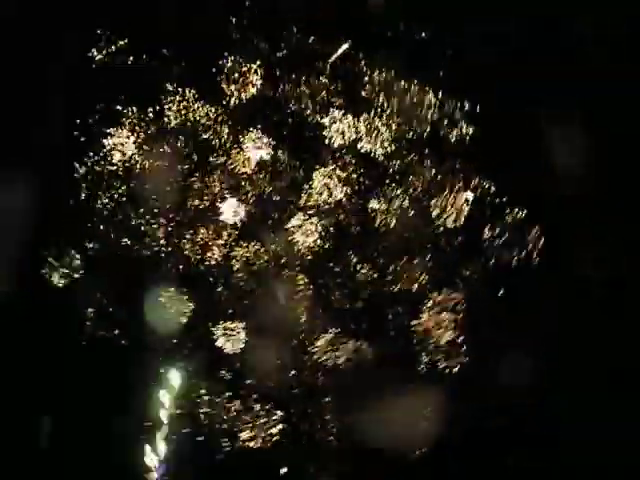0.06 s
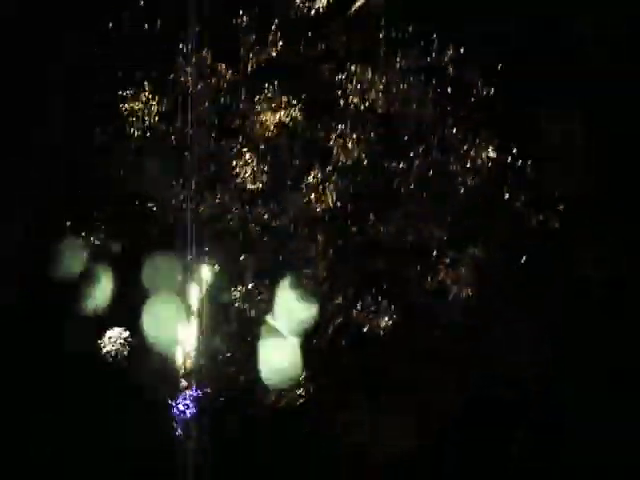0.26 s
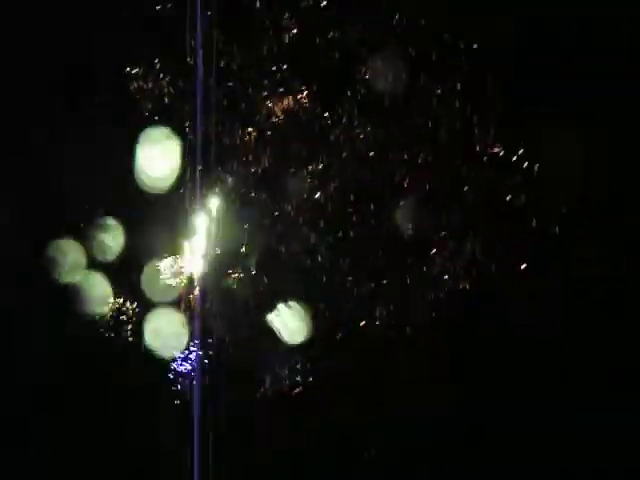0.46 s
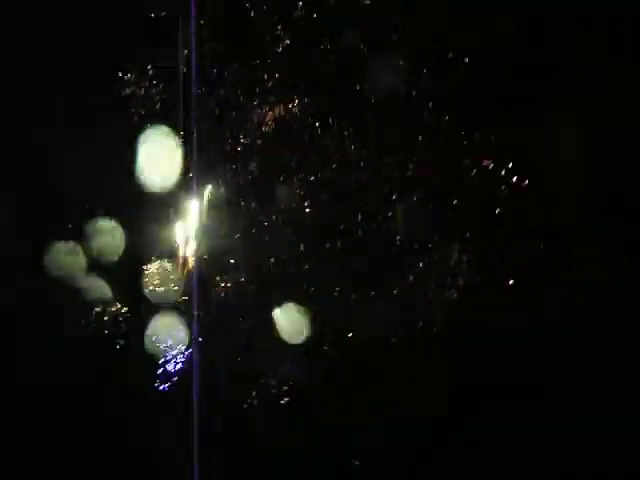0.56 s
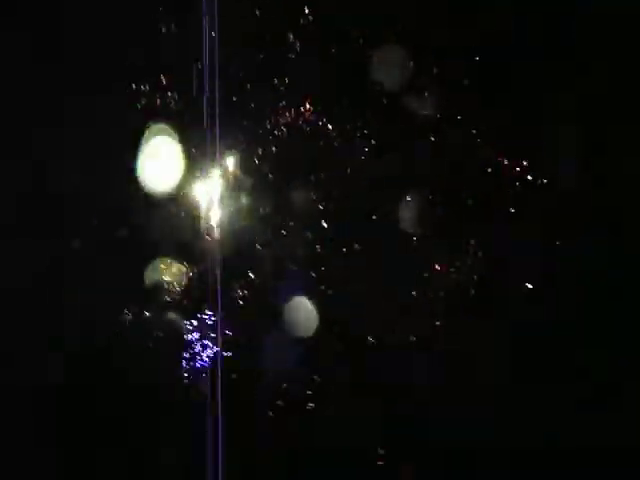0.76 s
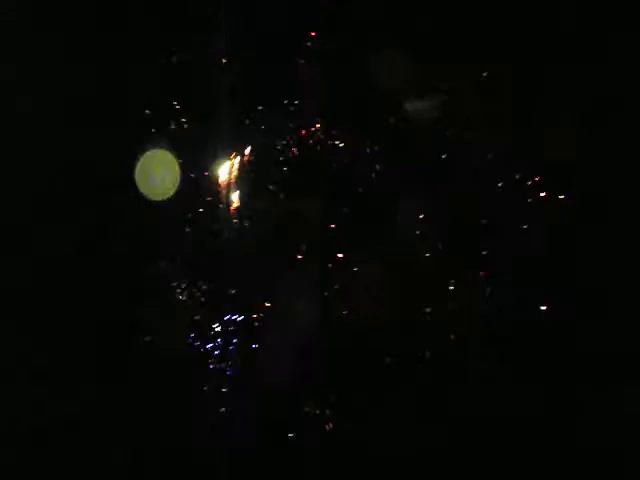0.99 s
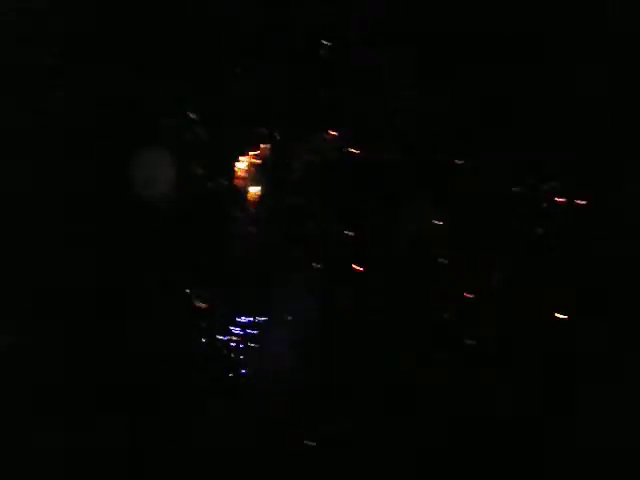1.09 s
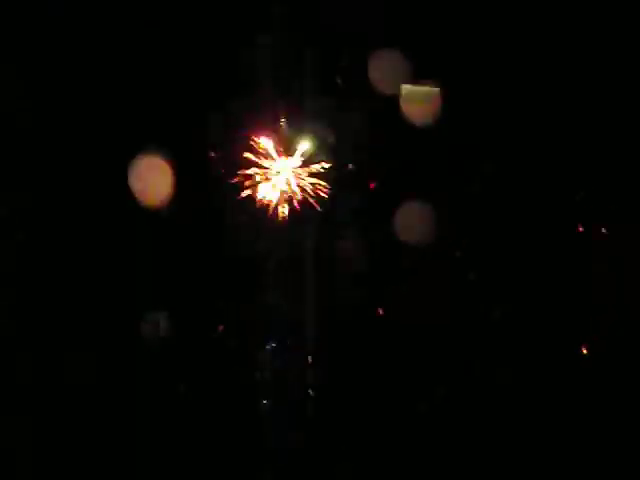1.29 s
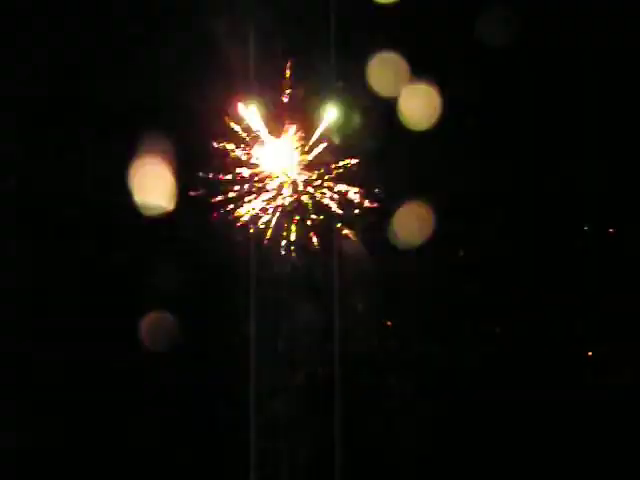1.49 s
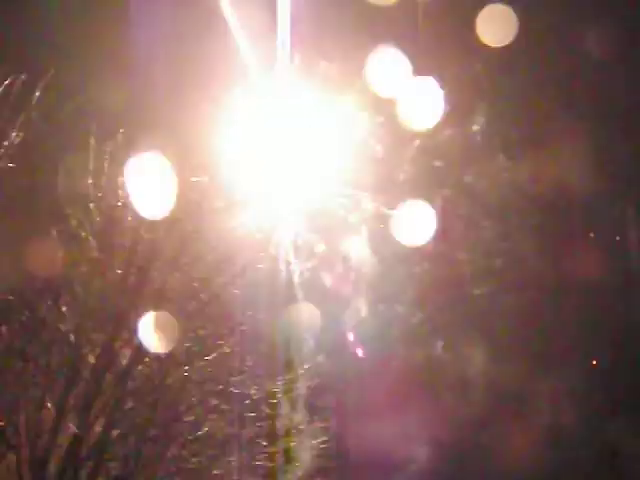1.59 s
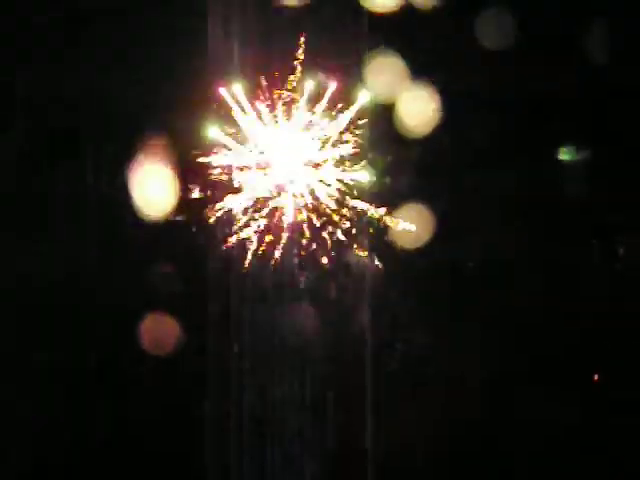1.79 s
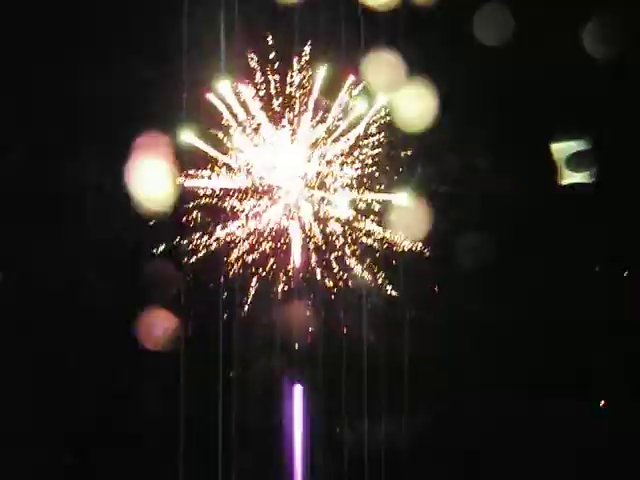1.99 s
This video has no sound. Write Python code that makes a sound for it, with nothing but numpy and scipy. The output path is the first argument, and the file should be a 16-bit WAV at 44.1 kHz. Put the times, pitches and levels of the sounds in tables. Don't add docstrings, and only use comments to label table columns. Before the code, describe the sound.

Fireworks over open ground: busy, gritty crackling and snapping pops above a distant knocking rumble, followed by three quick near blasts, the first strongest, flattened and distorted by a small, muffled, ringing microphone.

```python
import sys
import numpy as np
from scipy import signal
from scipy.fft import rfft, irfft, next_fast_len
from scipy.io import wavfile
from scipy.ndimage import uniform_filter1d

SR = 44100
rng = np.random.default_rng(int(sys.argv[2]) if len(sys.argv) > 2 else 0)


def decibels_to_gain(level_db):
    exponent = np.asarray(level_db, float) / 20
    return 10 ** exponent


def unload_audio(sound):
    columns = np.transpose(np.atleast_2d(sound))
    steps = np.round(np.clip(columns, -1, 1) * 32767)
    wavfile.write(sys.argv[1], SR, steps.astype(np.int16))


N = 90404

# t/s, push height/full scale, push decay/s, roar level/dB, roar hold/s
BURSTS = [
    (1.3242, 2.9, .012, -8.5, .0195),
    (1.6108, 1.6, .0135, -22, .014),
    (1.7744, 1.05, .018, -33, .010),
]
# f/Hz, level/dB
MIC_COLOUR = [(350, -30.5), (650, -11.5), (2000, -9.5), (2650, -4), (3070, 1.5), (3600, -8), (5200, -20),
              (9000, -57)]
ROAR_WAIT_S = .0155


def colour(x, points):
    size = next_fast_len(N + 8192)
    size += size % 2
    hz, db = np.transpose(points)
    bins_hz = np.arange(size // 2 + 1) * SR / size
    log_gain = np.interp(np.log(bins_hz + 1), np.log(hz), db) * np.log(10) / 20
    cepstrum = irfft(log_gain, size)
    cepstrum[1:size // 2] *= 2
    cepstrum[size // 2 + 1:] = 0
    return irfft(rfft(x, size) * np.exp(rfft(cepstrum)), size)[:N]


def rms_one(x):
    return x / np.sqrt(np.mean(x ** 2) + 1e-20)


def drift(rate_hz):
    settle = 9000
    r = np.exp(-2 * np.pi * rate_hz / SR)
    smooth = signal.lfilter([1], [1, -2 * r, r * r], rng.standard_normal(N + settle))
    return rms_one(smooth[settle:])


def since(s, longest=.25):
    at = slice(int(s * SR), min(int((s + longest) * SR), N))
    t = np.arange(at.start, at.stop) / SR - s
    return at, np.maximum(t, 0), np.clip(t * SR + 1, 0, 1)


def clicks(per_s, spread_db):
    sizes = decibels_to_gain(spread_db * np.minimum(rng.exponential(1, N), 4)) * rng.choice([-1, 1], N)
    return rms_one(sizes * (rng.random(N) < per_s / SR))


def stars(level_db, grain_db):
    stars_per_s, click_db, echo_db, clump_db = 1500, 2.0, -2.0, 1.5
    sharp = signal.lfilter([1, -0.8], [1], clicks(stars_per_s, spread_db=3.2))
    echoes = decibels_to_gain(echo_db) * rng.standard_normal(N)
    mix = decibels_to_gain(click_db + grain_db) * sharp + echoes
    clumps_db = clump_db * decibels_to_gain(grain_db) * drift(51)
    return decibels_to_gain(level_db + clumps_db) * rms_one(colour(mix, MIC_COLOUR))


def pops():
    # t/s of the peak, peak level/dB, length/ms
    loud_stars = [(0.0187, -15.0, 0.8), (0.0376, -11.0, 1.6), (0.0458, -14.0, 0.7), (0.0586, -17.5, 1.0),
                  (0.1459, -17.0, 0.8), (0.201, -10.0, 0.9), (0.206, -14.0, 0.6), (0.2093, -15.5, 0.8),
                  (0.2274, -16.5, 1.2), (0.2519, -12.5, 1.2), (0.258, -10.0, 1.1), (0.2751, -17.5, 0.7),
                  (0.2833, -16.0, 0.4), (0.294, -18.0, 0.5), (0.3051, -18.0, 0.7), (0.3318, -15.5, 0.8),
                  (0.336, -8.0, 1.6), (0.3389, -16.5, 0.6), (0.3796, -13.0, 0.6), (0.385, -16.0, 0.7),
                  (0.3884, -14.5, 0.7), (0.3932, -11.5, 0.9), (0.3995, -13.5, 0.7), (0.4043, -15.0, 0.5),
                  (0.4097, -3.0, 0.8), (0.4134, -8.5, 0.6), (0.4203, -17.5, 1.0), (0.4788, -13.5, 0.7),
                  (0.4848, -11.5, 1.3), (0.4875, -3.5, 0.7), (0.4953, -16.0, 1.7), (0.5013, -16.5, 2.1),
                  (0.5045, -18.5, 0.6), (0.5596, -16.5, 0.8), (0.6242, -14.0, 1.0), (0.6269, -15.5, 0.7),
                  (0.6354, -14.5, 0.8), (0.64, -15.5, 0.6), (0.6512, -15.0, 1.0), (0.6644, -16.0, 1.3),
                  (0.6723, -9.5, 0.9), (0.6858, -10.0, 1.1), (0.6905, -13.0, 0.5), (0.6983, -14.0, 0.6),
                  (0.7077, -11.0, 1.4), (0.729, -15.0, 1.1), (0.7341, -13.5, 0.9), (0.7485, -16.0, 0.7),
                  (0.7524, -13.5, 2.1), (0.7591, -15.5, 1.2), (0.7694, -14.0, 0.6), (0.791, -16.0, 0.7),
                  (0.809, -11.5, 1.2), (0.8127, -14.0, 0.7), (0.8459, -16.5, 0.6), (0.8568, -16.0, 0.6),
                  (0.8741, -13.5, 1.0), (0.8801, -13.5, 0.7),
                  (0.8838, -12.0, 1.0), (0.8914, -10.5, 0.7), (0.898, -14.0, 0.5), (0.9026, -13.0, 2.5),
                  (0.9108, -13.5, 1.2), (0.9145, -14.5, 0.6), (0.9179, -13.5, 0.7), (0.921, -13.0, 1.2),
                  (0.9248, -14.5, 1.5), (0.9329, -5.0, 0.7), (0.941, -15.0, 0.8), (0.9481, -14.5, 2.1),
                  (0.9706, -15.0, 0.8), (0.9776, -10.0, 1.5), (0.9839, -15.5, 0.7), (1.0023, -15.5, 1.3),
                  (1.0131, -8.0, 1.6), (1.0174, -14.5, 0.5), (1.039, -16.5, 0.9), (1.0788, -16.5, 0.5),
                  (1.0952, -14.5, 1.5), (1.1117, -14.5, 0.8), (1.1205, -4.5, 0.7), (1.1261, -8.0, 0.5),
                  (1.1301, -9.0, 0.9), (1.1557, -16.0, 1.1), (1.1713, -16.0, 0.5), (1.1743, -15.5, 0.8),
                  (1.1788, -12.5, 1.1), (1.1859, -6.0, 0.5), (1.1979, -17.5, 1.6), (1.2153, -12.5, 1.3),
                  (1.2255, -4.0, 1.2), (1.2543, -15.0, 0.9), (1.37, -13.0, 0.9), (1.3884, -16.0, 0.6),
                  (1.4059, -13.5, 1.5), (1.4186, -17.0, 1.4), (1.5342, -11.0, 0.7), (1.5549, -17.0, 0.9),
                  (1.5826, -17.0, 0.6), (1.5861, -16.5, 0.9), (1.6322, -10.0, 1.5), (1.6465, -14.0, 2.0),
                  (1.6529, -12.5, 1.7), (1.6587, -15.0, 1.1), (1.6727, -14.0, 0.8)]
    puff_spread, click_db, loudest_db = 0.74, 12.0, -4.0
    rows = loud_stars
    out = np.zeros(N + 600)
    capsule = colour(np.arange(N) == 0, MIC_COLOUR)[:300]
    t_ms = np.arange(-150, 150) * 1000 / SR
    for (s, db, ms), noise in zip(rows, rng.standard_normal((len(rows), 300))):
        ms = max(ms, .2)
        puff = noise * np.exp(-(t_ms / (puff_spread * ms)) ** 2)
        click = decibels_to_gain(click_db) / ms * (t_ms == 0)
        rung = np.convolve(puff - click, capsule)
        start = int(s * SR) - np.argmax(uniform_filter1d(rung ** 2, size=15))
        out[start:start + len(rung)] += decibels_to_gain(min(db, loudest_db)) * rung / np.max(np.abs(rung))
    return out[:N]


def blasts():
    # t/s, dip level/dB, dip length/ms, lasting step/full scale
    shock_fronts = [(.4093, -12, .17, 0), (.4873, -6, .17, 0), (1.3225, -40, .3, -.08), (1.3329, 8, .35, 0),
                    (1.3353, 7, 1.0, 0), (1.3369, 4, .3, 0), (1.3393, 0, .25, 0), (1.3410, 3, .2, 0),
                    (1.3420, 3, .2, 0), (1.3430, 2, .2, 0), (1.3455, 1, .2, -.15), (1.6143, 5, .25, 0),
                    (1.6195, 4, .5, 0), (1.6219, -2, 1.1, 0), (1.6232, 2, .5, .3), (1.6256, -5, 1.4, -.15),
                    (1.7785, -17, .3, 0), (1.7809, -30, .3, -.3), (1.7835, 1, .5, .35),
                    (1.7857, -1.5, .3, -.17), (1.7899, -30, .3, -.08), (1.7946, -5, .25, .17),
                    (1.7969, -15, 1.3, -.03), (1.803, -40, .3, .05)]
    front_db, front_ms = 11, 0.31
    push_rise_s, step_decay_s = 0.001, 0.026
    ring_hz, ring_t60_s, ring_db = 3075, 0.0016, 8
    push, dips = np.zeros((2, N))
    for s, height, decay_s, _, _ in BURSTS:
        at, t, _ = since(s + front_ms / 1000)
        push[at] += height * np.minimum(t / push_rise_s, 1) * np.exp(-(t / decay_s) ** 1.5)
    burst_fronts = [(row[0], front_db, front_ms, 0) for row in BURSTS]
    for s, db, ms, step in shock_fronts + burst_fronts:
        at, t, gate = since(s)
        dips[at] -= decibels_to_gain(db) * gate * np.clip((ms / 1000 - t) * SR, 0, 1)
        push[at] += step * gate * np.exp(-t / step_decay_s)
    r, w = decibels_to_gain(-60 / (ring_t60_s * SR)), 2 * np.pi * ring_hz / SR
    poles = [1, -2 * r * np.cos(w), r * r]
    ring = signal.lfilter([np.sin(w) / 2, -np.sin(w) / 2], poles, dips + 1e-18)
    return push + dips + decibels_to_gain(ring_db) * ring


def roars():
    rise_s, t60_s, low_db = .001, .03, -5
    shape = np.zeros(N)
    for s, _, _, db, hold_s in BURSTS:
        at, t, _ = since(s + ROAR_WAIT_S)
        fall_db = 60 * np.maximum(t - hold_s, 0) / t60_s
        shape[at] += np.clip(t / rise_s, 0, 1) * decibels_to_gain(db - fall_db)
    band = signal.butter(2, [60, 450], "band", fs=SR, output="sos")
    low = signal.sosfilt(band, rng.standard_normal(N))
    high = colour(rng.standard_normal(N), MIC_COLOUR)
    return shape * decibels_to_gain(0.85 * drift(220)) * (rms_one(high) + decibels_to_gain(low_db) * rms_one(low))


def far_shells(level_db):
    # t/s, signed height/full scale, width/ms
    thuds = [(0.1344, 0.21, 6.2), (0.1383, -0.22, 3.5), (0.166, 0.082, 14), (0.1889, -0.08, 16),
             (0.2038, 0.21, 6), (0.2071, -0.21, 3.4), (0.2126, -0.17, 2.6), (0.22, 0.13, 13),
             (0.252, -0.09, 11), (0.259, 0.22, 1.7), (0.2617, -0.23, 2.2), (0.3009, -0.047, 7.1),
             (0.321, 0.21, 5.9), (0.329, -0.18, 0.86), (0.3332, 0.22, 4.4), (0.348, -0.066, 15),
             (0.3545, 0.24, 3.3), (0.3716, 0.22, 1.9), (0.3765, -0.14, 14), (0.389, -0.15, 3),
             (0.4, -0.2, 4.3), (0.4062, -0.37, 0.77), (0.4076, -0.53, 2.25), (0.4108, 0.18, 0.94),
             (0.4157, 0.65, 3), (0.525, 0.16, 2.7), (0.628, -0.11, 3.1), (0.646, 0.065, 5.8),
             (0.673, -0.28, 2.5), (0.6886, -0.14, 4.4), (0.7073, 0.52, 1), (0.71, -0.29, 2.5),
             (0.75, 0.12, 1.8), (0.8695, 0.24, 3), (0.878, 0.13, 0.94), (0.9033, 0.22, 1.9),
             (0.9152, 0.094, 5.5), (0.9221, 0.04, 3), (0.932, -0.34, 3), (0.9386, -0.16, 3),
             (0.9526, 0.19, 1.5), (0.9674, -0.23, 1.24), (0.9717, 0.19, 2.9), (0.9776, -0.0091, 2),
             (0.9825, 0.15, 1.06), (1.0139, 0.33, 1), (1.0169, 0.18, 0.82), (1.04, -0.042, 3),
             (1.075, -0.2, 6.2), (1.0787, 0.14, 4.3), (1.0844, -0.34, 2.4), (1.0914, 0.16, 3.6),
             (1.1158, -0.14, 2.6), (1.167, -0.17, 1.8), (1.197, 0.061, 6.1), (1.2027, -0.23, 4.3),
             (1.212, -0.24, 1.3), (1.2259, 0.085, 0.52), (1.526, -0.062, 2.3), (1.5375, 0.21, 1.1)]
    # f/Hz, density/(dB per Hz)
    rumble_colour = [(12, -31.5), (22, -5), (113, -0.5), (228, -9), (480, -12), (800, -21), (1300, -28.5),
                     (2600, -73)]
    rumble_db, lump_db, knocks_per_s, knock_db = -2.5, 2.0, 140, -4
    thud_gain, thud_point = 1.2, 1.48
    mix = rng.standard_normal(N) + decibels_to_gain(knock_db) * clicks(knocks_per_s, spread_db=2.0)
    out = decibels_to_gain(level_db + rumble_db + lump_db * drift(24.0)) * rms_one(colour(mix, rumble_colour))
    for s, height, ms in thuds:
        at, t, _ = since(s - .02, .04)
        widths = np.abs(t - .02) * 1000 / np.clip(ms, .7, 13)
        out[at] += thud_gain * height * np.exp(-(2.1 * widths) ** thud_point)
    return out


def debris():
    knock_s, knock_hz, peak_db, decay_s = .2568, 1480, -15, 0.0022
    out = np.zeros(N)
    at, t, _ = since(knock_s, .05)
    out[at] = decibels_to_gain(peak_db) * np.sin(2 * np.pi * knock_hz * t) * np.exp(-t / decay_s)
    return out


def wash():
    wash_db, t60_s = -44, 1.53
    shape = np.zeros(N)
    for s, height, *_ in BURSTS:
        at, t, _ = since(s + ROAR_WAIT_S, 1)
        shape[at] += height ** 1.48 * decibels_to_gain(wash_db - 60 * t / t60_s)
    band = signal.butter(2, [241, 533], "band", fs=SR, output="sos")
    echo = rms_one(signal.sosfilt(band, rng.standard_normal(N)))
    return shape * decibels_to_gain(1.5 * drift(33)) * echo


def scene():
    # t/s, crackle level/dB, rumble level/dB, clicks over their echoes/dB
    display = [(0.0, -28.5, -30.5, 0.5), (0.189, -32, -29, -4), (0.211, -27.5, -25.5, -2),
               (.34, -29, -31, 3.5), (.37, -21.5, -16, -10.5), (0.419, -31.5, -29.5, 16),
               (0.431, -33.5, -30.5, 3), (.58, -31, -30, 2), (.66, -25.5, -25, 5.5), (.8, -26, -27, -4.5),
               (0.902, -25.5, -19.5, 5.5), (1.048, -25.5, -25, -1), (1.199, -31, -23, 8),
               (1.279, -36.5, -27, 0.5), (1.398, -27, -33.5, -9.5), (1.7, -26.5, -46, -0.5),
               (1.938, -36.5, -45, -9.5), (2.05, -31.5, -46, -2)]
    s, *columns = np.transpose(display)
    crackle_db, rumble_db, grain_db = [np.interp(np.arange(N) / SR, s, c) for c in columns]
    near = stars(crackle_db, grain_db) + pops() + blasts() + roars()
    background = far_shells(rumble_db) + debris() + wash()
    return (near + background)[None]


def band_limit(x):
    return signal.sosfilt(signal.butter(12, 16500, fs=SR, output="sos"), x)


def record(dry):
    swing_hz, swing_q, swing_top = 2.1, 1.1, .8
    clip_top, knee, cut_hz, ceiling = 0.69, 4.9, 5776, 0.69
    w = 2 * np.pi * swing_hz
    charge = np.clip(dry, -swing_top, swing_top)
    b, a = signal.bilinear([w / swing_q, w * w], [1, w / swing_q, w * w], SR)
    x = dry - signal.lfilter(b, a, charge)
    x = x / (1 + np.abs(x / clip_top) ** knee) ** (1 / knee)
    top_cut = signal.firwin(41, cut_hz, window=("kaiser", 6.0), fs=SR)
    x = signal.filtfilt(top_cut, 1, x)
    mix = np.clip(x, -ceiling, ceiling)
    return band_limit(mix)


dry = scene()
out = record(dry)
unload_audio(out)
```